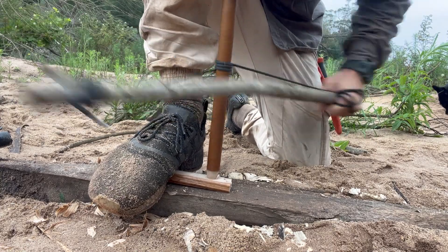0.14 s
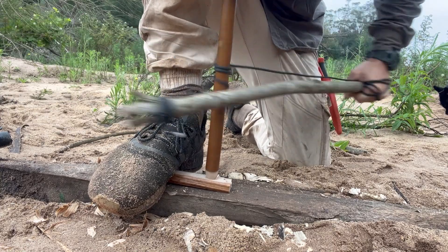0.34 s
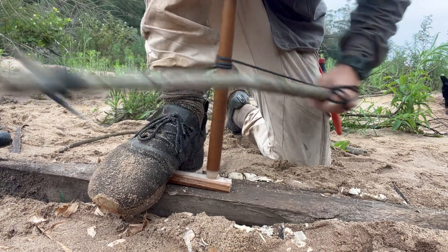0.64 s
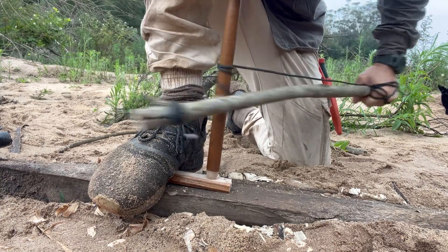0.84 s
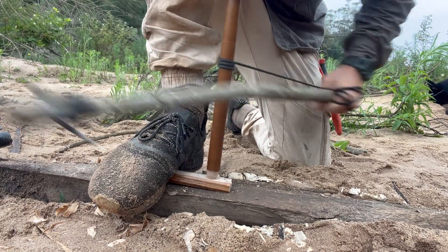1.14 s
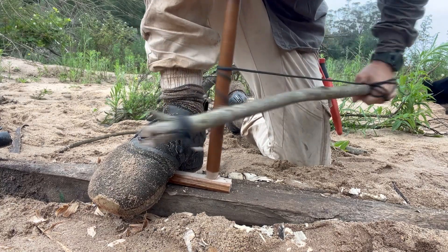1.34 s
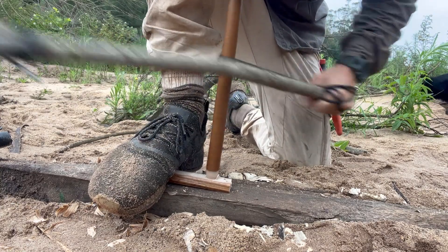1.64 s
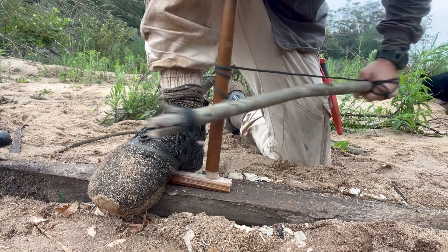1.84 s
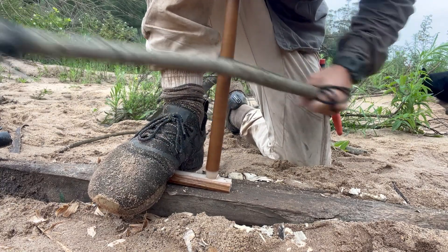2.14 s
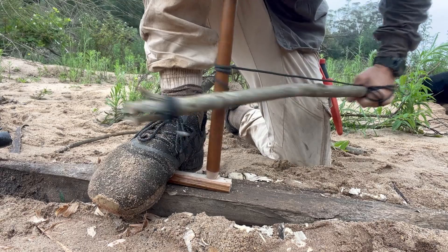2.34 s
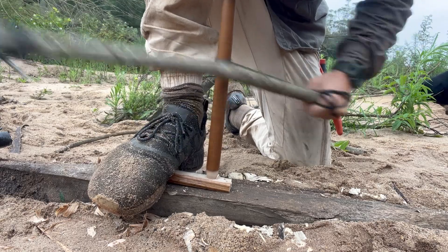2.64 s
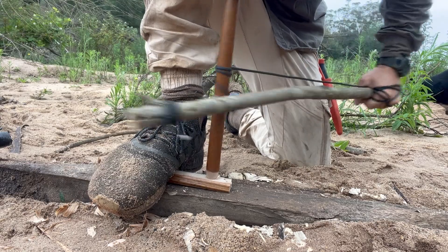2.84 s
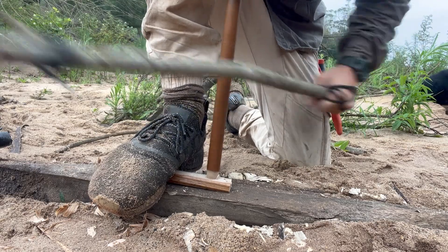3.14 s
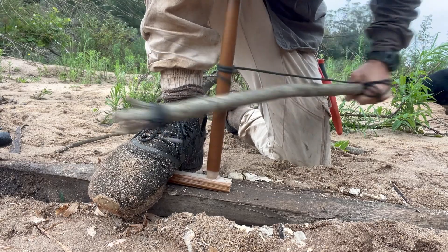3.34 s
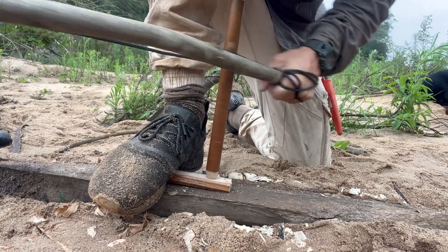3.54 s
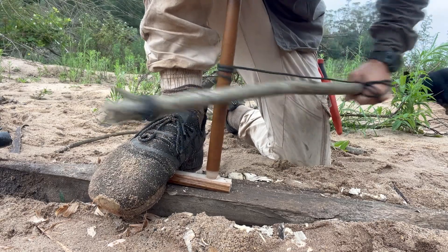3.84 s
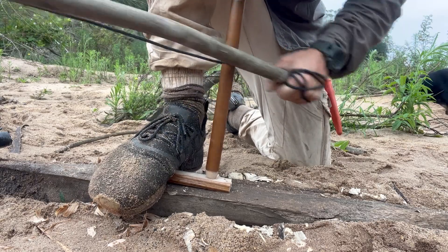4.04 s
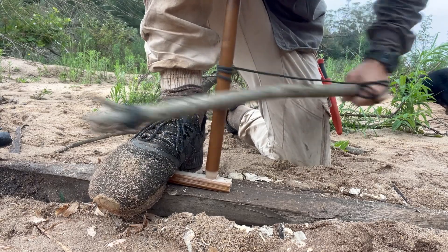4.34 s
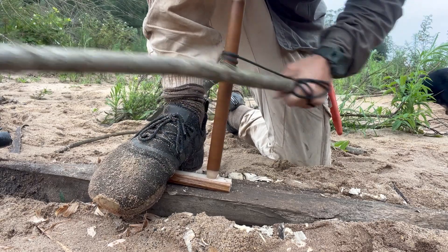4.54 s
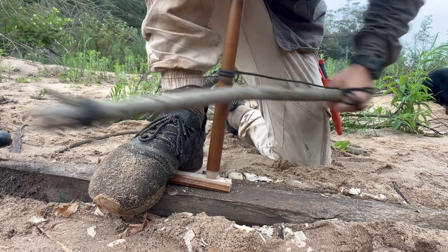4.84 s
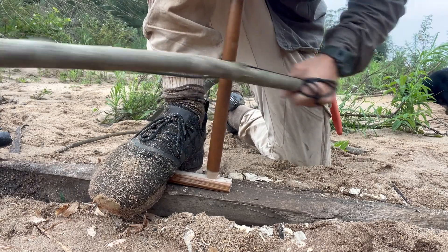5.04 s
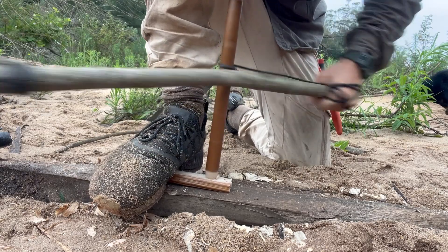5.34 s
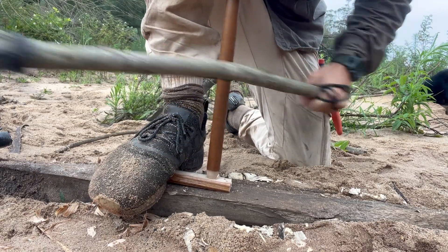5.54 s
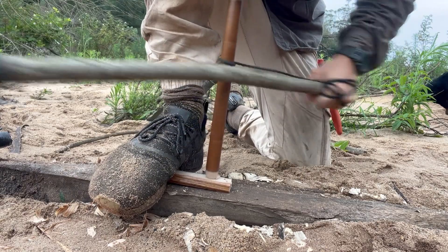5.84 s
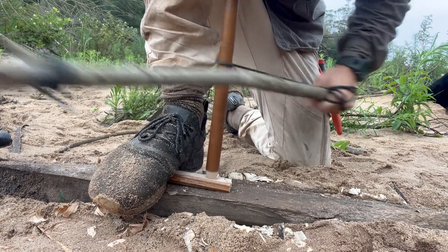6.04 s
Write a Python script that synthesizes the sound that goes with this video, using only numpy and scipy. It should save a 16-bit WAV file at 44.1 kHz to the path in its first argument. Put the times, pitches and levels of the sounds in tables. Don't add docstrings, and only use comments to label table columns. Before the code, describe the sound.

A cord bow spins a wooden spindle back and forth in a dry board, strokes hissing and squeaking at each turn, then smoothing out outdoors.

```python
import sys
import numpy as np
from scipy import signal
from scipy.fft import rfft, irfft, next_fast_len
from scipy.io import wavfile
from scipy.ndimage import uniform_filter1d

SR = 44100
rng = np.random.default_rng(int(sys.argv[2]) if len(sys.argv) > 2 else 0)


def generate_wav(sig):
    pcm = np.round(np.clip(np.atleast_2d(sig).T, -1, 1) * 32767).astype(np.int16)
    wavfile.write(sys.argv[1], SR, pcm)


def field_ratio(decibels):
    return 10 ** (np.asarray(decibels, dtype=float) / 20)


N = 272979
TIME = np.arange(N) / SR


def unit(x):
    return x / np.sqrt(np.mean(x ** 2) + 1e-20)


def along(points, hz):
    f, v = np.transpose(points)
    return np.interp(np.log(hz + 1), np.log(f + 1), v)


def wander(rate):
    knots = rng.standard_normal(int(N * rate / SR) + 2)
    return np.interp(TIME * rate, np.arange(len(knots)), knots)


def filtered(x, response):
    m = next_fast_len(N + SR // 4)
    return irfft(rfft(x, m) * response(np.fft.rfftfreq(m, 1 / SR)), m)[..., :N]


def resonant(peaks):
    def response(f):
        total = 0
        for k, (centre, width, db) in enumerate(peaks):
            damping = 1j * f * width
            total = total + (-1) ** k * field_ratio(db) * damping / (centre * centre - f * f + damping)
        return total
    return response


def grit(spread_db, rate):
    return unit(rng.standard_normal((2, N)) * field_ratio(spread_db * wander(rate)))


def patchy(x, size, depth_db, bins, frames):
    z = signal.stft(x, nperseg=size)[2]
    field = rng.standard_normal(z.shape[1:])
    field = uniform_filter1d(field, bins, 0)
    field = uniform_filter1d(field, frames, 1)
    return unit(signal.istft(z * field_ratio(depth_db * unit(field)), nperseg=size)[1][:, :N])


def ring(modes, t, attack):
    hz, db, t60 = np.transpose(modes)[:, :, None]
    size = field_ratio(db + rng.normal(0, 2.2, (2, len(modes), 1)) - 60 * t / t60)
    hz = hz * (1 + 0.042 * rng.standard_normal((len(modes), 1)))
    phase = rng.uniform(0, 2 * np.pi, (2, len(modes), 1)) * [[[0.08]], [[1]]]
    takes = (size * np.sin(2 * np.pi * hz * t + phase)).sum(1) * (1 - np.exp(-t / attack))
    return takes / np.abs(takes).max(axis=1, keepdims=True)


# (time of the turn [s], hiss at the turn [dB], speed-up [s], pressure [dB])
STROKES = [(0, -44.5, 0.1, 0), (0.255, -55, 0.1, 0), (0.501, -49.5, .09, -0.5), (.764, -56.5, 0.087, 0),
           (1.002, -46.5, .11, 2), (1.26, -50.5, .15, 1.5), (1.519, -49.5, 0.092, 0.5),
           (1.77, -52.5, 0.12, 0), (2.03, -53.5, 0.075, -0.5), (2.267, -53.5, 0.095, -0.5),
           (2.515, -49, 0.098, -0.5), (2.77, -53, 0.11, 1), (3.018, -50.5, 0.071, -0.5),
           (3.26, -58.5, 0.085, 0), (3.494, -51, 0.098, 0.5), (3.744, -51, 0.088, 1.5),
           (3.979, -48.5, 0.1, 0), (4.245, -55, 0.062, 0.5), (4.479, -60, 0.068, 0),
           (4.729, -61, 0.077, 0.5), (4.965, -62.5, 0.065, 0), (5.213, -61, 0.046, 0),
           (5.433, -67, 0.069, 0), (5.688, -64, 0.051, 0), (5.926, -69.5, 0.072, 0), (6.167, -67, 0.038, 0)]
END_S, END_DB = 6.4, -60


def strokes():
    turns_s = np.array([row[0] for row in STROKES] + [END_S])
    count = np.interp(TIME, turns_s, np.arange(len(turns_s)))
    number = count.astype(int)
    press_db = uniform_filter1d(np.array(STROKES)[number, 3], size=900)
    return number, count - number, press_db


def swing(peak):
    number, done, _ = strokes()
    return np.cos(np.pi * (number + done - 2 * peak))


BRAKE = (0.9, .8)


def spin_db():
    full_spin_db, pause_s = -36.5, 0.013
    out = np.zeros(N)
    following = STROKES[1:] + [(END_S, END_DB)]
    for k, ((s, still, rise, press), (end, stop, *_)) in enumerate(zip(STROKES, following)):
        at = slice(round(s * SR), round(end * SR))
        full = full_spin_db + press
        slow = 1 - np.clip((TIME[at] - s - pause_s) / rise, 0, 1)
        brake = 1 - np.clip((end - TIME[at]) / (rise * BRAKE[k % 2]), 0, 1)
        out[at] = full + (still - full) * slow ** 2 + (stop - full) * brake ** 2
    return out


# (frequency [Hz], width [Hz], level [dB])
WOOD = [(1396, 194, 0), (1924, 225, 0), (2280, 179, -3), (2644, 550, -6), (3680, 623, -1.5), (4400, 668, 2),
        (5776, 462, 3), (6615, 750, -5.5), (8532, 390, 0), (10920, 800, -13.5), (13050, 1430, -15),
        (16400, 240, -20)]


def rub(spin):
    scrape = patchy(grit(spread_db=0.0, rate=990), size=256, depth_db=3.0, bins=5, frames=8)
    ticks_db = 3.4 * np.clip(wander(220) - 1.1, 0, 3)
    flutter_db = 1.0 * wander(70) + 0.12 * wander(16)
    hiss = unit(filtered(scrape, resonant(WOOD)))
    return field_ratio(spin + 2.5 + flutter_db + ticks_db) * hiss


# (time [s], length [s], level [dB], swell [dB], squeak [dB])
SLIPS = [(.007, .0143, -27, -7, -29.5), (.265, 0.011, -25, -1.5, -49), (.515, 0.016, -28.5, 5.5, -33.5),
         (0.772, 0.013, -27, 1.5, -39), (1.016, 0.02, -27, 3.5, -34.5), (1.272, 0.01, -26, -2, -38),
         (1.539, 0.0095, -29.5, -1.5, -36), (1.784, 0.016, -25, 1, -31), (2.046, 0.012, -27.5, -1.5, -34),
         (2.28, .024, -25, -5, -30), (2.506, .039, -27.5, 3, -61.5), (2.778, .0174, -22, -2.5, -29),
         (3.023, 0.013, -22.5, -2, -31.5), (3.266, 0.019, -24, -5, -25.5), (3.501, 0.019, -25, 4.5, -38),
         (3.748, 0.018, -21, 1, -22.5), (3.999, 0.012, -24, -3, -32), (4.248, 0.018, -22.5, 4.5, -28.5)]
# (time [s], length [s], level [dB], swell [dB])
CATCHES = [
    (0.504, 0.0055, -26.5, -3),
    (.999, 0.014, -29, -2),
    (1.526, 0.0035, -27.5, -0.5),
    (2.034, 0.0029, -32, 7.5),
    (3.734, .0065, -27, 1.5),
    (3.972, 0.014, -33.5, 14.5),
    (4.227, 0.0042, -29.5, 0.5),
]
# (frequency [Hz], level [dB])
SLIP_TILT = [(800, -34), (2000, -3.5), (4000, 5.5), (8500, 8), (12000, -1), (16000, -2)]
# (time [s], extra treble [dB])
POLISH = [
    (0, -5),
    (3.4, 5.5),
    (3.75, 11),
    (4.3, 15.5),
]


def slips():
    catch_squeak_db, squeak_hz, scatter = -44, 1846, 0.0083
    gate, squeak, waver = np.zeros(N), np.zeros((2, N)), wander(250)
    events = [(*row, catch_squeak_db) for row in CATCHES] + SLIPS
    for s, length, level_db, swell_db, squeak_db in events:
        hz = squeak_hz * (1 + scatter * rng.standard_normal())
        at = slice(round(s * SR), round((s + length + 0.014) * SR))
        t = TIME[at] - s
        edges = np.clip(t / 0.0025, 0, 1) * field_ratio(-60 * np.clip(t - length, 0, 1) / 0.014)
        gate[at] += edges * field_ratio(level_db + swell_db * (2 * np.clip(t / length, 0, 1) - 1))
        swell = np.sin(np.pi * np.clip(t / (length + 0.0047), 0, 1) ** 1.65) ** 1.6
        phase = 2 * np.pi * hz * (t + 0.043 * (t * t / length - t)) + 0.71 * waver[at]
        squeak[:, at] += field_ratio(squeak_db + 2.5) * swell * np.array([np.sin(phase), np.cos(phase)])

    def colour(f):
        return resonant(WOOD)(f) ** 0.89 * field_ratio(along(SLIP_TILT, f))

    chatter = patchy(grit(spread_db=5.0, rate=1300), size=256, depth_db=4.5, bins=3, frames=5)
    rasp = filtered(chatter, colour)
    rasp = rasp / np.sqrt(uniform_filter1d(rasp[0] ** 2, size=420))
    sheen = field_ratio(np.interp(TIME, *np.transpose(POLISH))) * filtered(rasp, lambda f: f > 11200)
    return field_ratio(3.5) * gate * (rasp + sheen) + squeak


# (time [s], peak [dB], scuff [dB], crack [dB], thud [dB])
SLAPS = [(.194, -18, -17, -28, -32), (.687, -9.5, -22, -11.5, -26), (1.181, -9.5, -9, -8.5, -27),
         (1.705, -15.5, -14, -30, -30.5), (2.206, -15, -20, -12, -31.5), (2.664, -17.5, 0.5, -10, -31.5),
         (2.702, -20, 0, -10, -31), (3.203, -16.5, -15, -22, -30.5), (3.665, -12.5, -16, -5.5, -31),
         (3.703, -21.5, -12, -15, -31), (4.164, -14.5, -3, -12.5, -33), (4.639, -16, -4, -9.5, -31.5),
         (4.657, -25, -9, -3.5, -36), (5.186, -17.5, -10, -18, -32.5), (5.639, -10.5, -25.5, -9.5, -30),
         (6.116, -13.5, -39, -29, -29.5)]
# (time [s], peak [dB], scuff [dB], crack [dB], thud [dB])
SEATS = [
    (.277, -16.5, -1.5, -14, -41),
    (.783, -25, 3, -3.5, -43),
    (1.275, -30.5, 4, 2.5, -55),
    (1.796, -17.5, -6, -13.5, -42),
    (2.298, -12.5, -8.5, -13, -35),
    (2.793, -16, 1, -7, -40),
    (3.284, -30.5, 8, -3, -38),
    (4.748, -17, -5, -15, -42),
    (5.233, -16.5, -8.5, -29, -42),
    (5.709, -12.5, -7, -14.5, -30.5),
]
# (time [s], peak [dB], scuff [dB], crack [dB], thud [dB])
WOBBLES = [(.391, -30, 13.5, 4.5, -40), (.904, -27.5, 11, 4.5, -38), (1.393, -31, 10, -.5, -46),
           (1.409, -25, 6.5, 0.5, -35), (1.923, -33, 12, 9.5, -38), (2.385, -33, 1, -12, -33.5),
           (2.878, -26, -19, -12, -32.5), (3.366, -24, 1, 0, -33), (3.444, -39.5, 22, -8, -28.5),
           (3.857, -25, -4, 2.5, -36), (4.347, -23.5, 1, -2.5, -32), (4.823, -26, 0, -5.5, -38),
           (4.878, -28, 11, 3.5, -25), (5.364, -40, 16, 6, -29.5), (5.787, -44, 23, 11, -53)]
# (slap [dB], seat [dB], wobble [dB])
TWANG_DB = (-31, -31, -36.5)
# (frequency [Hz], level [dB], decay to -60 dB [s])
TAP = [(462, -11, 0.012), (590, -9, 0.0067), (786, -9.5, 0.021), (960, -7, 0.0098), (1089, -4, 0.013),
       (1316, 0.5, 0.012), (1770, -17, 0.017), (1984, -12, 0.01)]
# (frequency [Hz], level [dB], decay to -60 dB [s])
CRACK = [(1874, 7.5, 0.024), (2395, -0.5, 0.024), (2823.3, 2, 0.026), (3520, 16.5, 0.0055),
         (4540, 2, 0.0088), (5243, -14, 0.00717)]
# (frequency [Hz], level [dB], decay to -60 dB [s])
THUD = [(222, -4, 0.059), (288, -3, 0.06), (352.5, 9, 0.034), (452, 9, 0.021)]
# (frequency [Hz], level [dB], decay to -60 dB [s])
TWANG = [(117.47, 6, 0.25), (181.3, 2, 0.16)]


def knocks():
    out, scuff = np.zeros((2, N + SR)), np.zeros(N + SR)
    t = np.arange(SR // 5) / SR
    brief = t[:SR // 25]
    hits = [(*row, twang) for rows, twang in zip((SLAPS, SEATS, WOBBLES), TWANG_DB) for row in rows]
    for s, db, scuff_db, crack_db, thud_db, cord_db in hits:
        at = round((s + 0.0006) * SR)
        board = ring(TAP, brief, attack=0.00075)
        board = board + field_ratio(crack_db + 7.0) * ring(CRACK, brief, attack=0.0001)
        out[:, at:at + len(brief)] += field_ratio(db + 0.5) * board
        thud = field_ratio(thud_db + 5.5) * ring(THUD, t, attack=0.0078)
        pluck = field_ratio(cord_db) * ring(TWANG, t, attack=0.012)
        out[:, at:at + len(t)] += thud + pluck
        fade = field_ratio(db + scuff_db - 5.0 - 60 * t / 0.032)
        scuff[at:at + len(t)] += fade * (1 - np.exp(-t / 0.0015))
    scrape = unit(filtered(rng.standard_normal((2, N)), resonant(WOOD)))
    return out[:, :N] + scuff[:N] * scrape


# (frequency [Hz], width [Hz], level [dB])
PLANK = [(189.5, 45, -5), (278, 52.3, 0.5), (313.4, 71, 0.5), (430.7, 75, -4.5), (544, 250, -17.5)]
# (frequency [Hz], width [Hz], level [dB])
BOARD = [(823, 290, 1.5), (1020, 260, -9), (1458, 160, -5)]
LEAN_PEAK = (0.71, 0.59)


def body(spin):
    plank_peak_db, plank_rest_db = np.array([-41.5, -35.5]), -54.5
    number, done, press_db = strokes()
    peak = np.array(LEAN_PEAK)[number % 2]
    lean = np.minimum(done / peak, (1 - done) / (1 - peak)) ** 0.48
    plank_db = plank_rest_db + lean * (plank_peak_db[number % 2] + 1.1 * press_db - plank_rest_db)
    board_db = -51 + 1.2 * press_db + 2.0 * wander(27)
    cord_db = -49.5 + 4.5 * swing(0.56)
    plank = unit(filtered(grit(spread_db=4.0, rate=130), resonant(PLANK)))
    board = unit(filtered(grit(spread_db=5.0, rate=120), resonant(BOARD)))
    thrum = grit(spread_db=-1.0, rate=8.3)
    cord = unit(filtered(thrum, lambda f: resonant([(117, 60, 0)])(f) ** 2))
    stall_db = spin + 37
    rumble = field_ratio(plank_db - 1.0 + 0.36 * stall_db) * plank
    hum = field_ratio(board_db - 3.0 + 0.69 * stall_db) * board
    return rumble + hum + field_ratio(cord_db + 3.0) * cord


# (frequency [Hz], density [dB per Hz])
AIR = [(25, -46), (50, 1), (70, 3), (200, -14.5), (600, -30), (2000, -31), (8000, -67), (16000, -78)]


def air():
    level_db = -49.5 - 0.5 * swing(0.65) + 0.66 * wander(4.1304)
    return field_ratio(level_db) * unit(filtered(grit(spread_db=3.5, rate=12), lambda f: field_ratio(along(AIR, f))))


def scene():
    spin = spin_db()
    return rub(spin) + slips() + knocks() + body(spin) + air()


# (low [Hz], high [Hz])
THIN_HZ = [
    [(3000, 3200), (12500, 22050)],
    [(9100, 11400), (14400, 22050)],
]


def starved(parts):
    usual_treble_db, steady_db = -58, 5
    hz, _, z = signal.stft(parts, SR, nperseg=1024)
    power = uniform_filter1d(np.abs(z) ** 2, size=9, axis=1)
    cell_db = 10 * np.log10(np.abs(power) + 1e-20)
    treble = np.abs(z[:, (hz > 3000) & (hz < 12000)]) ** 2
    treble_db = 10 * np.log10(treble.sum(0).mean(0) + 1e-20)
    spared_db = 5 * np.clip(np.abs(treble_db - usual_treble_db) - steady_db, 0, None)
    ragged = hz[:, None] * (1 + 0.02 * rng.standard_normal(len(treble_db)))
    thin = np.array([sum((ragged > low) & (ragged < high) for low, high in bands) for bands in THIN_HZ])
    under_treble_db = -22 + treble_db + 12 * thin
    under_other_db = cell_db[::-1] - 10
    limit_db = np.maximum(under_treble_db, under_other_db) - spared_db
    kept = (cell_db > limit_db) | (hz[:, None] < 1200)
    return signal.istft(z * kept, SR, nperseg=1024)[1][:, :N]


def roll_off(x):
    return signal.sosfilt(signal.butter(12, 16480, fs=SR, output="sos"), x)


# (frequency [Hz], lead [rad])
LEAD = [(40, 0), (170, 1.3), (345, .2), (520, 1.6), (860, -.9), (2300, 0), (2700, -1.5), (3500, -2.3),
        (4300, -.7), (5200, -2.2), (7750, -1.5), (9800, 0), (11700, 1), (13600, np.pi)]
# (frequency [Hz], level [dB])
LOUDER = [(50, 0.5), (110, -2.5), (200, -3.5), (380, 0), (700, 0), (1290, -2), (2380, -0.5), (4400, 0.5),
          (8120, -0.5), (15000, 0.0)]
# (frequency [Hz], likeness [0-1])
ALIKE = [(40, .95), (100, .6), (260, .4), (400, .75), (700, .55), (1250, .96), (2300, .7), (4300, .62),
         (5000, .25), (5800, .78), (7400, .45), (8600, .93), (10300, .99), (12000, .6), (13500, .97)]


def record(dry):
    half = np.array([[0.5], [-0.5]])
    top_hz, ceiling = 16100, 0.62

    def share(f):
        angle = np.arccos(np.clip(along(ALIKE, f), 0, 1)) / 2
        return np.array([np.cos(angle), np.sin(angle)])

    def ports(f):
        tilt = np.exp(1j * half * along(LEAD, f)) * field_ratio(half * along(LOUDER, f))
        return tilt * np.clip((top_hz - f) / 300, 0, 1)

    shared, apart = filtered(dry, share)
    heard = filtered(np.array([shared + apart, shared - apart]), ports)
    left, right = heard / (1 + np.abs(heard / ceiling) ** 4) ** (1 / 4)
    mid, side = starved(np.array([left + right, left - right]) / 2)
    return roll_off(np.array([mid + side, mid - side]))


dry = scene()
out = record(dry)
generate_wav(out)
```